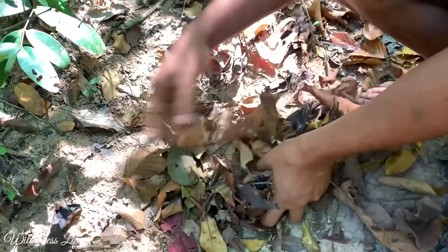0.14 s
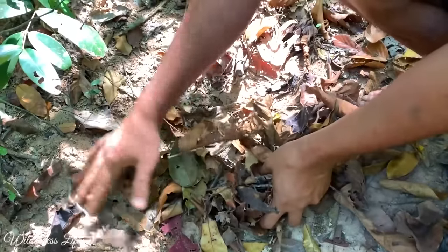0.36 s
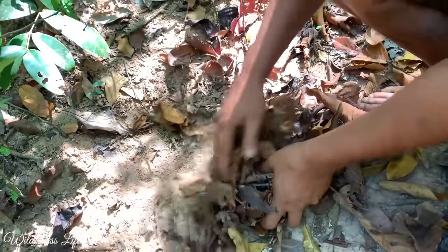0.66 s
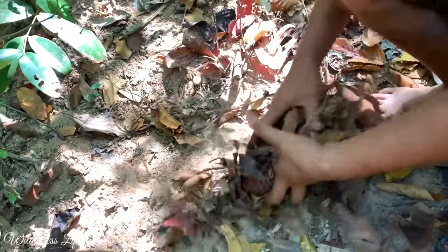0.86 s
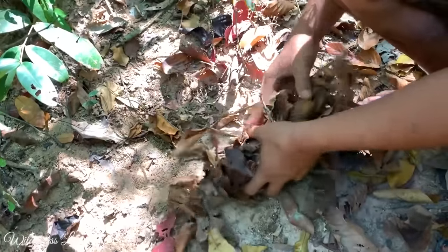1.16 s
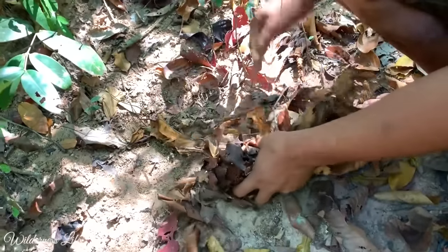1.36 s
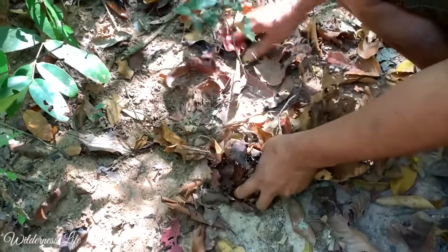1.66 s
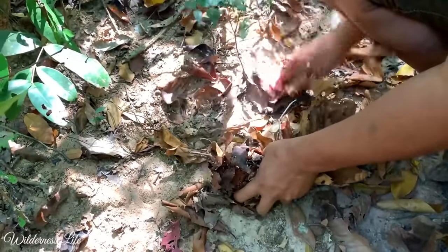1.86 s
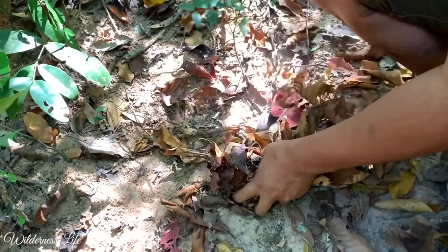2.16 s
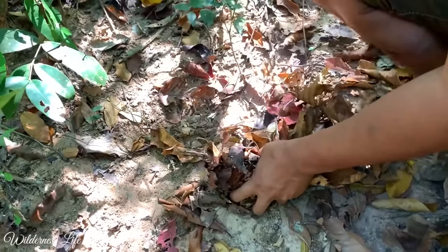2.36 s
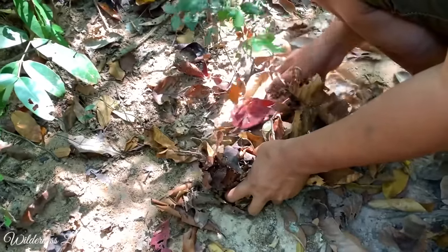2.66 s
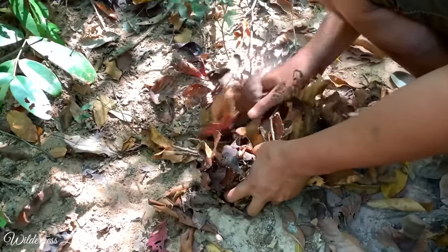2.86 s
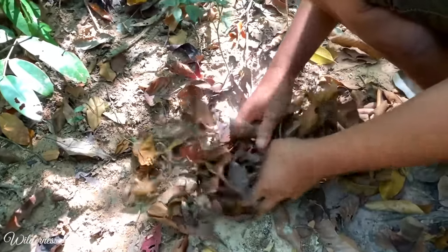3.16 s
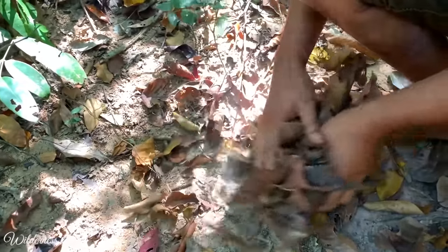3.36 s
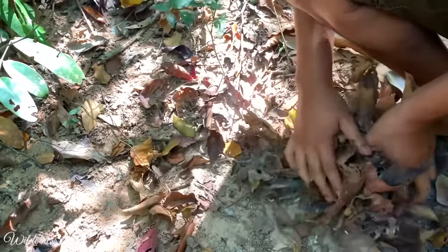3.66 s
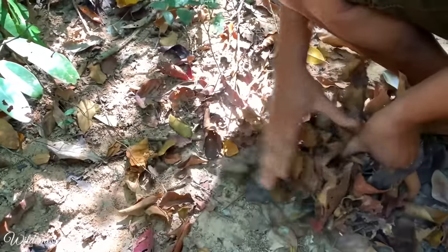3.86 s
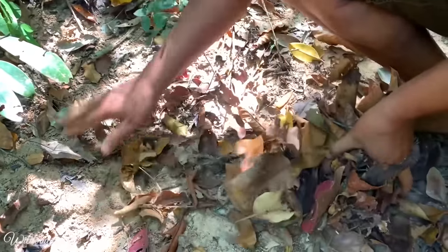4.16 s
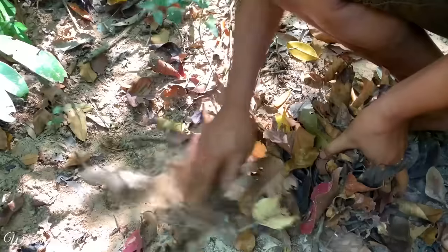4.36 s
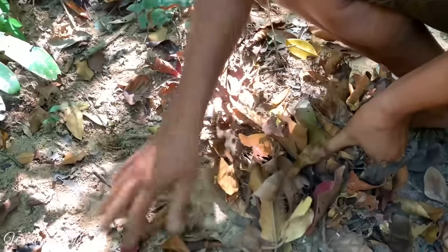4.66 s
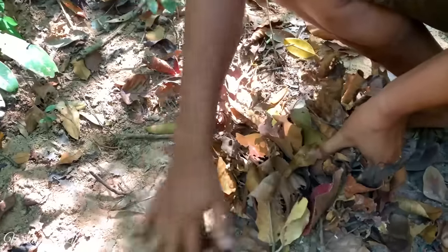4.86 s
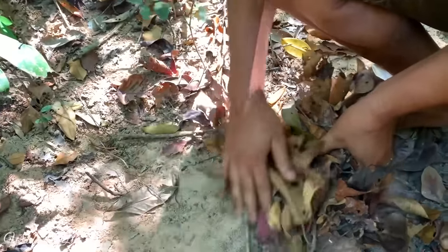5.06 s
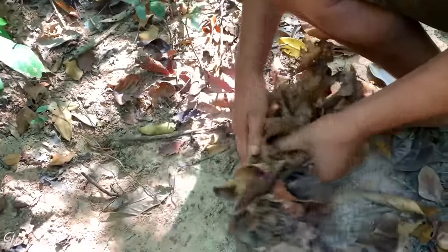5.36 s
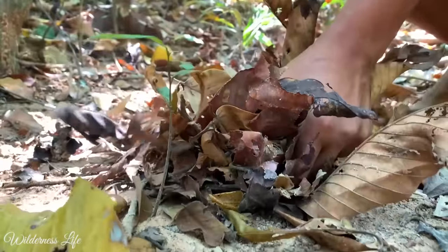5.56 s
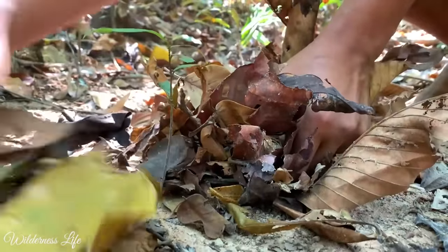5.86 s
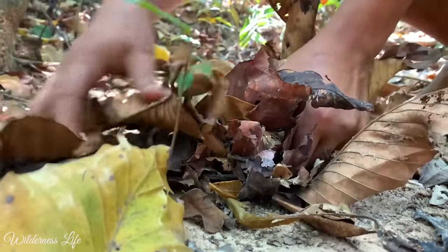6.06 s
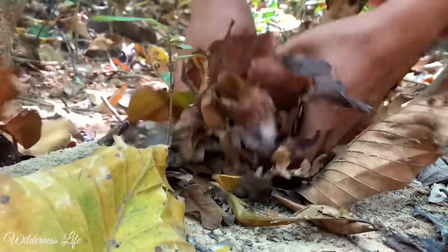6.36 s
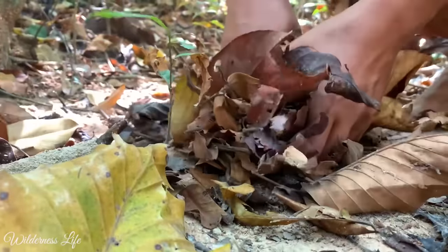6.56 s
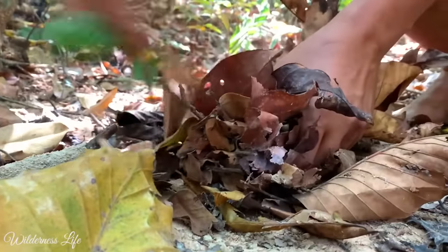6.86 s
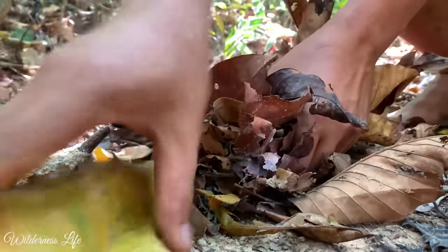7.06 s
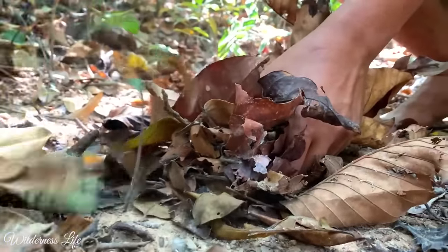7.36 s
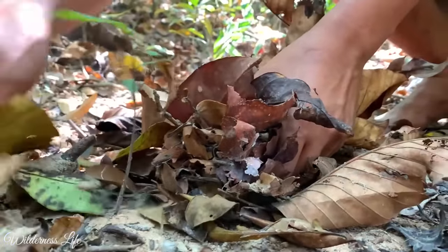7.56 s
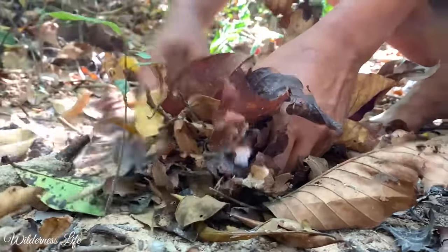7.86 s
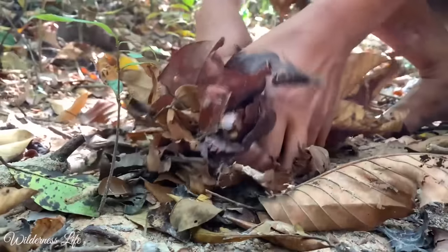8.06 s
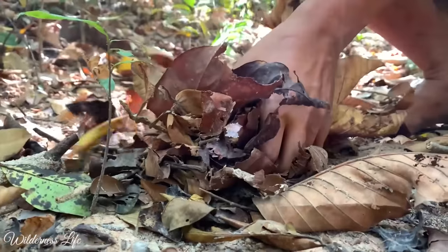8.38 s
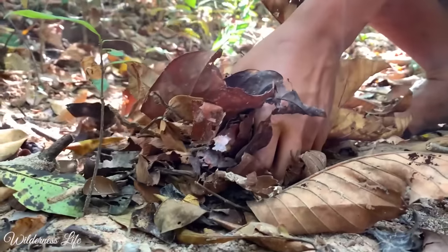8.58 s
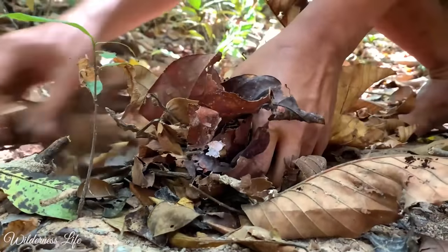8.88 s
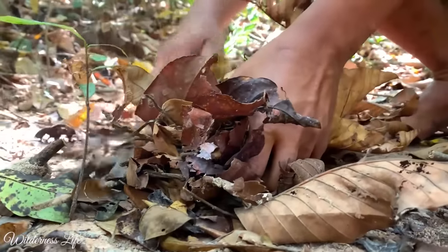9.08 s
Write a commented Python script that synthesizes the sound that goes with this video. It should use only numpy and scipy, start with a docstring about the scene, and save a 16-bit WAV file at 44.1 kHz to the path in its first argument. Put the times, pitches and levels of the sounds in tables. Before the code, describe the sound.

Heard close from above, dry leaves rustle and crackle in irregular sweeps as hands gather them over forest soil, with small stalk snaps and twig knocks. A faint low drone hangs far away. The sound cuts out for an instant and returns with the microphone on the ground beside the heap, where the crunching is a little louder, with dragging leaves, clearer twig clicks and soft thuds.

```python
"""Hands rake dry leaves into a heap on a forest floor, heard from above: each stroke is a shower of
tiny fractures over a dull scrape of soil. Stalks snap, twigs knock, big stiff leaves drag and buzz.
A low, distant drone swells up to 3.7 s, then recedes. Near 5.4 s comes a short silence.
After it the microphone lies on the ground beside the heap, where it catches more bumps of the hands."""
import sys
import numpy as np
from scipy import signal
from scipy.fft import rfft, irfft, next_fast_len
from scipy.io import wavfile
from scipy.ndimage import uniform_filter1d, map_coordinates

SR = 44100
rng = np.random.default_rng(int(sys.argv[2]) if len(sys.argv) > 2 else 0)


def dump(signal):
    """Clip the signal to [-1, 1] and save it as 16-bit WAV at the path in sys.argv[1]."""
    limited = np.clip(np.atleast_2d(signal).T, -1, 1)
    pcm = np.round(limited * 32767).astype(np.int16)
    wavfile.write(sys.argv[1], SR, pcm)


N = 406585
GAP_START_S, GAP_END_S = 5.371, 5.492


def amp(db):
    """Decibels to gain."""
    return 10 ** (np.asarray(db) / 20)


def unit(x):
    """Scale to rms 1."""
    return x / np.sqrt(np.mean(x ** 2) + 1e-20)


def along(points, hz):
    """(Hz, value) points joined on a log axis."""
    point_hz, values = np.transpose(points)
    return np.interp(np.log(hz + 1), np.log(point_hz), values)


def curve(points):
    """(Seconds, value) points joined, one value per sample."""
    return np.interp(np.arange(N) / SR, *np.transpose(points))


def filtered(x, response):
    """Apply a frequency response to x."""
    n = x.shape[-1]
    padded = next_fast_len(n + 8192)
    return irfft(rfft(x, padded) * response(np.fft.rfftfreq(padded, 1 / SR)), padded)[..., :n]


def coloured(x, spectrum):
    """x shaped by (Hz, dB) points, at rms 1."""
    return unit(filtered(x, lambda hz: amp(along(spectrum, hz))))


def resonance(hz, centre_hz, q):
    """Response of one damped mode."""
    return 1j * hz * centre_hz / q / (centre_hz ** 2 - hz ** 2 + 1j * hz * centre_hz / q)


def band(x, centre_hz, q):
    """x through the same mode twice, at rms 1."""
    return unit(filtered(x, lambda hz: resonance(hz, centre_hz, q) ** 2))


def add(track, start_s, sound):
    """Mix a sound into the track."""
    part = track[:, max(round(start_s * SR), 0):][:, :sound.shape[-1]]
    part += sound[..., :part.shape[-1]]


def fractures(per_s, spread_db, t60_s):
    """Power of random little breaks of uneven size, each sudden and quickly dying; mean 1."""
    sizes = amp(spread_db * np.minimum(rng.standard_normal(N), 2.3)) ** 2
    kicks = sizes * (rng.random(N) < per_s / SR)
    power = signal.lfilter([1], [1, -amp(-120 / (t60_s * SR))], kicks)
    return power / power.mean()


def forest(air_db=-58, drone_hz=61):
    """Faint air and a far, wavering drone."""
    # Each row: frequency in Hz, relative level in dB.
    air_spectrum = [(20, -13), (55, -1), (250, -15.5), (1000, -35.5), (16000, -41.5)]
    # Each row: time in seconds, level in dB.
    drone_levels = [(0, -70), (2.6, -57), (3.7, -52), (4.6, -55), (9.2, -63.5)]
    drone = amp(curve(drone_levels)) * band(rng.standard_normal((2, N)), drone_hz, q=3.7)
    return drone + amp(air_db) * coloured(rng.standard_normal((2, N)), air_spectrum)


def rubs(events, q, slips_per_s, steady_db, bend, gain_db):
    """Sliding and slipping shake a resonance; bend raises its pitch over the push."""
    out = np.zeros((2, N))
    power = fractures(slips_per_s, spread_db=8.5, t60_s=0.097) + amp(steady_db) ** 2
    slips = np.sqrt(power) * rng.standard_normal((2, N))
    for start_s, length_s, pitch_hz, db in events:
        push = slips[:, round(start_s * SR):][:, :round(length_s * SR)]
        slack, bent = (band(push, pitch_hz * np.exp(way * bend), q) for way in (-1, 1))
        progress = np.linspace(0, 1, push.shape[-1])
        ring = unit((1 - progress) * slack + progress * bent)
        envelope = np.interp(progress, [0, .03, .7, 1], [0, 1, 1, 0])
        add(out, start_s, amp(db + gain_db) * ring * envelope)
    return out


def soil_bumps():
    """Hand and heap bump softly on the soil: low and heavily damped."""
    # Each row: start in seconds, length in seconds, pitch in Hz, relative level in dB.
    bumps = [(2.49, 0.15, 303, -46), (5.76, 0.48, 139.6, -48), (7.15, 0.11, 124, -38),
             (7.32, 0.035, 216, -43.5), (7.44, 0.096, 104, -40.5), (7.56, 0.56, 191, -44)]
    return rubs(bumps, q=0.76, slips_per_s=140, steady_db=-6, bend=0, gain_db=-0.5)


def leaf_drags():
    """Stiff leaves and fingers drag and buzz; the pitch rises as the leaf bends."""
    # Each row: start in seconds, length in seconds, pitch in Hz, relative level in dB.
    drags = [(.11, 0.13, 1190, -40.5), (.46, 0.11, 367, -48.5), (2.655, 0.045, 2460, -33.5),
             (2.85, 0.49, 2630, -43.5), (4.38, 0.11, 5500, -38), (4.97, 0.24, 4040, -43),
             (5.765, 0.28, 2020, -33.5), (6.28, 0.44, 970, -40), (7.55, 0.11, 2300, -36),
             (8.665, 0.32, 2400, -36.5), (8.99, .26, 1130, -41)]
    return rubs(drags, q=3.1, slips_per_s=600, steady_db=0, bend=.06, gain_db=2.0)


def twig_ticks(rattle_t60_s=0.028, rattle_db=-6):
    """Twigs knock together: one woody mode rings, dying twice as fast as the rattle around it."""
    # Each row: time in seconds, pitch in Hz, peak in dB.
    knocks = [(.131, 1110, -26), (.408, 1300, -27), (1.743, 1200, -27), (2.25, 980, -32.5),
              (2.314, 472, -32), (2.385, 2500, -29), (2.413, 1770, -31.5), (6.559, 1140, -16),
              (6.757, 1090, -13.5), (7.889, 870, -15.5), (8.126, 1630, -19.5), (9.121, 2130, -14)]
    out, t = np.zeros((2, N)), np.arange(SR // 16) / SR
    fade = amp(-60 * t / rattle_t60_s)
    for start_s, pitch_hz, db in knocks:
        noise = rng.standard_normal((2, len(t)))
        rattle = unit(filtered(noise, lambda hz: resonance(hz, pitch_hz, q=2.8)))
        ring = fade * (fade * np.sin(2 * np.pi * pitch_hz * t) + amp(rattle_db) * rattle)
        add(out, start_s, amp(db) * ring / np.abs(ring).max())
    return out


def stalk_snaps(gain_db=-2.5, scatter_db=-15, splinter_db=-9, highpass_hz=1500):
    """A stalk or rib tears within milliseconds and rings its leaf; the litter scatters the sound."""
    # Each row: time in seconds, leaf pitch in Hz, relative level in dB.
    snaps = [(.073, 3180, -22), (0.1294, 3720, -8), (.186, 3000, -18), (.375, 4000, -23), (0.48, 3700, -25),
             (1.124, 3460, -23), (1.277, 3120, -15.5), (1.485, 3980, -26.5), (2.313, 3100, -29.5),
             (2.791, 2570, -18), (3.075, 2510, -20.5), (3.352, 2780, -24), (4.098, 6120, -27.5),
             (5.295, 8020, -21), (5.765, 1800, -23), (6.166, 4180, -19.5), (6.34, 5040, -15.5),
             (6.557, 4630, -15.5), (6.664, 7440, -16.5), (6.775, 7480, -14.5), (6.787, 7000, -17),
             (7.45, 7600, -21.5), (7.572, 2540, -20.5), (7.813, 4320, -19.5), (8.591, 10400, -32),
             (8.968, 10000, -15), (9.104, 5500, -14.5)]
    out, t = np.zeros((2, N)), np.arange(SR // 10) / SR
    rise_s, tear_s, scatter_t60_s = .0005, .0034, .07
    scatter = amp(scatter_db - 60 * t / scatter_t60_s)
    fade = np.minimum(t / rise_s, 1) * (np.exp(-(t / tear_s) ** 2) + scatter)
    for start_s, leaf_hz, db in snaps:
        def leaf(hz):
            """Splinters add fizz; a leaf is too small to radiate bass."""
            return (resonance(hz, leaf_hz, q=2.5) + amp(splinter_db)) * 1j * hz / (highpass_hz + 1j * hz)
        crack = unit(filtered(fade * rng.standard_normal((2, len(t))), leaf))
        add(out, start_s, amp(db + gain_db) * crack * np.sqrt(np.mean(fade ** 2)))
    return out


def flakes(count, low_hz, high_hz, spread_db, decay_cycles):
    """Loose bits flick past each other, each ringing briefly at its own pitch."""
    t = np.arange(384) / SR
    start, pitch, side_phase = rng.random((3, count, 1))
    hz = low_hz * (high_hz / low_hz) ** pitch
    size = amp(spread_db * np.minimum(rng.standard_normal((count, 1)), 2)) * hz
    envelope = size * np.exp(-t * hz / decay_cycles) * (1 - t / t[-1])
    samples = ((start * N).astype(int) + np.arange(len(t))).ravel()
    rings = (envelope * np.sin(2 * np.pi * (hz * t + phase)) for phase in (0, side_phase))
    return unit(np.array([np.bincount(samples, ring.ravel(), N)[:N] for ring in rings]))


def shifting_colour(x, depth_db=1.77):
    """Random, brief patches of boost and cut make the rustle's colour flicker."""
    spectra = signal.stft(x, nperseg=512)[2]
    field = rng.standard_normal(spectra.shape[1:])
    for _ in range(2):
        field = uniform_filter1d(uniform_filter1d(field, size=4, axis=0), size=8, axis=1)
    return signal.istft(spectra * unit(amp(depth_db * unit(field))), nperseg=512)[1][:, :N]


def hand_levels(attack_s=0.022, release_db_per_s=143, hold_crackle_db=-48.5, hold_scrape_db=-55.5):
    """Crackle and scrape in dB: each stroke bites in, swells or eases, then the leaves settle."""
    # Each row: start in seconds, length in seconds, mid-stroke crackle in dB,
    # swell from start to end in dB, soil scrape against crackle in dB.
    strokes = [(-.04, 0.28, -32, 0.5, -14), (0.443, 0.18, -41.5, 9, -15.5), (0.621, 0.22, -30, 0, -11.5),
               (0.81, 0.22, -33.5, 12, -9), (1.11, 0.027, -31.5, 4.5, -12.5),
               (1.212, 0.087, -36.5, 7, -10.5), (1.344, 0.14, -43.5, -6.5, -13),
               (1.742, 0.29, -32.5, 8, -14.5), (2.494, 0.21, -33.5, -1.5, -12), (2.759, 0.44, -34, 3.5, -9),
               (3.25, 0.22, -46, -11, -8), (3.543, 0.15, -38.5, 12, -8), (3.785, 0.22, -44, -2.5, -7),
               (4.261, 0.083, -45.5, -5, -3.5), (4.359, .19, -33, 5, -13), (4.66, 0.15, -49, -8, -2.5),
               (4.882, 0.07, -41.5, -3.5, -10), (4.93, 0.49, -35, 6, -9), (5.747, 0.28, -29.5, 9, -12.5),
               (6.06, 0.33, -28, 1, -10.5), (6.396, 0.27, -32.5, 4, -5.5), (6.707, 0.063, -32, 8.5, -7.5),
               (6.835, 0.048, -41, 6, -1.5), (7.129, 0.097, -28, 0.5, -16), (7.319, 0.053, -34, -1, -21),
               (7.432, 0.03, -32.5, 4, -8.5), (7.532, 0.37, -27.5, 1, -10.5),
               (7.906, 0.41, -35, -6.5, -6.5), (8.411, 0.048, -41, 1.5, -8.5), (8.647, 0.18, -34.5, 7, -8),
               (8.847, 0.048, -28, 8, -6.5), (8.956, 0.16, -29, 7.5, -11.5), (9.137, 0.12, -33, 0.5, -3)]
    # The hand holding the heap keeps it rustling, and rests once.
    # Each row: time in seconds, effort in dB.
    hold_effort = [(2.1, 0.5), (2.41, -7), (2.475, -9.5), (2.5, 0.5)]
    t = np.arange(N) / SR
    holding = amp(curve(hold_effort))
    crackle, scrape = (holding * amp(hold_crackle_db)) ** 2, (holding * amp(hold_scrape_db)) ** 2
    for start_s, length_s, db, swell_db, soil_db in strokes:
        live = slice(*np.searchsorted(t, [start_s, start_s + length_s + 1]))
        age_s = t[live] - start_s
        ramp_db = swell_db * (np.minimum(age_s / length_s, 1) - .5)
        release_db = release_db_per_s * np.maximum(age_s - length_s, 0)
        stroke = np.minimum(age_s / attack_s, 1) * amp(db + ramp_db - release_db)
        crackle[live] += stroke ** 2
        scrape[live] += (stroke * amp(soil_db)) ** 2
    return 10 * np.log10([crackle, scrape])


def raking(levels_db, leaves, soil, crackle_gain_db, scrape_gain_db, peak_breaks_per_s,
           flake_db, slide_db, crinkle_db, grit_db, twig_db):
    """A sweeping hand breaks, buckles and slides leaves, and scrapes soil and twigs under them."""
    crackle_db, scrape_db = levels_db
    # A faster hand breaks and slides more leaves; a slow one leaves single crackles.
    effort = amp((crackle_db - crackle_db.max()) / 2)
    breaks = fractures(peak_breaks_per_s * effort, spread_db=5, t60_s=.006) / effort
    crinkles = fractures(per_s=120, spread_db=3.5, t60_s=.016)  # whole leaves buckle
    buckle, slide = amp(crinkle_db) ** 2, effort * amp(slide_db) ** 2
    power = (breaks / breaks.mean() + buckle * crinkles + slide) / (1 + buckle + slide)
    rustle = unit(np.sqrt(power) * rng.standard_normal((2, N)))
    chips = flakes(count=8000, low_hz=1200, high_hz=16000, spread_db=5, decay_cycles=6)
    crackle = coloured(rustle + amp(flake_db) * chips, leaves)
    grit = fractures(per_s=260, spread_db=5.0, t60_s=0.027)
    rasp = unit(np.sqrt(power + amp(grit_db) ** 2 * grit) * rng.standard_normal((2, N)))
    twigs = flakes(count=600, low_hz=450, high_hz=1800, spread_db=2.5, decay_cycles=7.3)
    scrape = unit(coloured(rasp, soil) + amp(twig_db) * coloured(twigs, soil))
    # Fingers catch and slip, bunching the sound into clumps.
    grip_db = .9 * map_coordinates(rng.standard_normal(512), [np.arange(N) * 45 / SR])
    sweep = amp(crackle_db + crackle_gain_db) * crackle + amp(scrape_db + scrape_gain_db) * scrape
    return unit(amp(grip_db)) * sweep


def leaf_heap():
    """The raking, heard from above until the gap ends, then from the ground beside the heap."""
    # Leaf and soil spectra at each position. Each row: frequency in Hz, relative level in dB.
    leaves_above = [(700, -19.5), (1400, -5.5), (2200, -3), (3600, 0), (5300, -3), (7000, -3.5),
                    (8500, -0.5), (12000, -5.5), (16000, -7.5)]
    leaves_beside = [(700, -5), (1400, -12.5), (2200, -1.5), (2900, -4.5), (5300, -1), (7000, -3),
                     (8500, 0), (12000, -5), (16000, -9)]
    soil_above = [(40, -14), (120, -7), (260, -6), (480, 0.5), (850, -2), (1200, 1), (1800, -1.5),
                  (3500, -84.5)]
    soil_beside = [(25, -46), (90, -12), (260, -6), (480, -3.5), (850, -5), (1200, 0), (1800, -4.5),
                   (3500, -23)]
    levels_db = hand_levels()
    above = raking(levels_db, leaves_above, soil_above, crackle_gain_db=3.5, scrape_gain_db=0.5,
                   peak_breaks_per_s=1300, flake_db=-8.5, slide_db=11, crinkle_db=0.5,
                   grit_db=-1.5, twig_db=-8.5)
    beside = raking(levels_db, leaves_beside, soil_beside, crackle_gain_db=2.5, scrape_gain_db=3.0,
                    peak_breaks_per_s=1000, flake_db=-8.0, slide_db=6.5, crinkle_db=-0.5,
                    grit_db=-3, twig_db=-10.0)
    return shifting_colour(np.where(np.arange(N) / SR < GAP_END_S, above, beside))


def microphone_ports(pair):
    """Two spaced ports share the first signal and differ by the second, in their own phase and colour."""
    # Each row: frequency in Hz, likeness of the ports from 0 to 1.
    coherence = [(300, .92), (900, .8), (1500, .45), (3200, .45), (6000, .3), (8500, .6), (11000, .87)]
    # Each row: frequency in Hz, lead of the left port in seconds.
    left_lead = [(1000, .0002), (1750, .00033), (2700, .00035), (4200, .00025), (6600, .000305),
                 (8600, .000291), (15000, .0003)]
    # Each row: frequency in Hz, left minus right in dB.
    balance = [(350, -1), (1100, 3.5), (2200, 2), (4000, 1), (6000, -2.5), (9000, -0.5)]

    def pickup(hz, sign):
        angle = np.arccos(np.clip(along(coherence, hz), 0, 1)) / 2
        gain = amp(sign * along(balance, hz) / 2)
        phase = np.exp(1j * np.pi * sign * hz * along(left_lead, hz))
        return gain * phase * np.array([np.cos(angle), sign * np.sin(angle)])
    return np.array([filtered(pair, lambda hz: pickup(hz, sign)).sum(0) for sign in (1, -1)])


def scene():
    """All sources at the two ports."""
    return microphone_ports(
        leaf_heap() + leaf_drags() + soil_bumps() + stalk_snaps() + twig_ticks() + forest())


def record(dry):
    """A quick fade to silence between positions; the microphone drops deep bass and top treble."""
    low_hz, top_hz, fade_t60_s = 32, 16000, .018
    t = np.arange(N) / SR
    fade = amp(-60 * np.maximum(t - GAP_START_S, 0) / fade_t60_s)
    gate = np.where(t < GAP_END_S, fade, 1)
    return filtered(dry * gate, lambda hz: hz ** 4 / (hz ** 4 + low_hz ** 4) / (1 + (hz / top_hz) ** 200))


dry = scene()
out = record(dry)
dump(out)
```